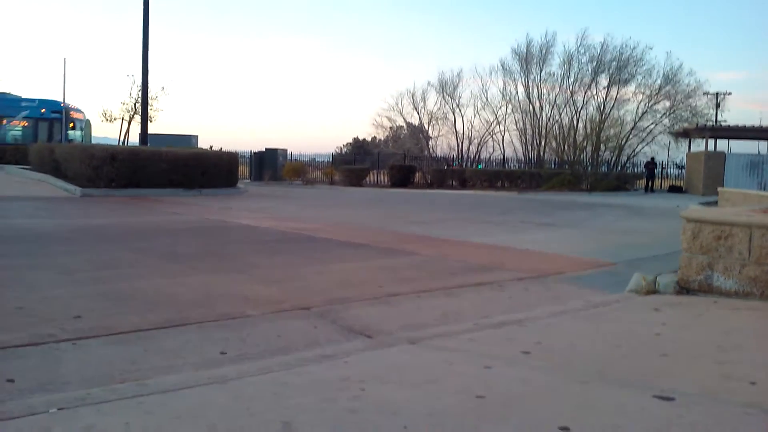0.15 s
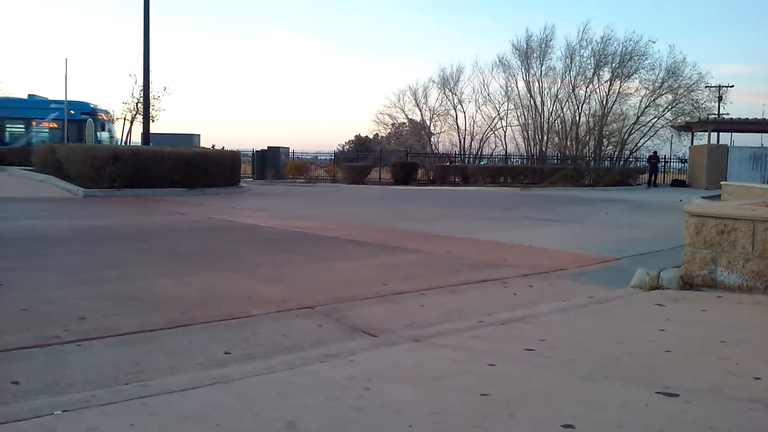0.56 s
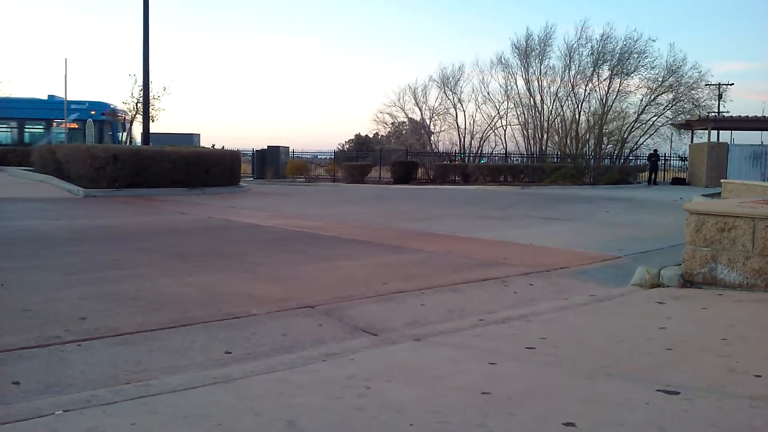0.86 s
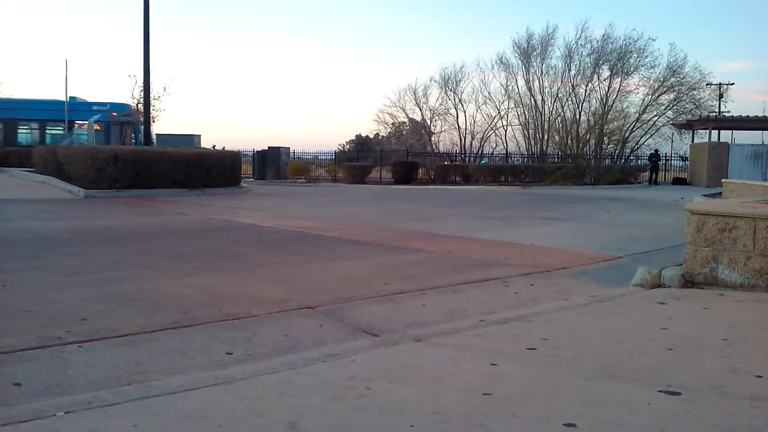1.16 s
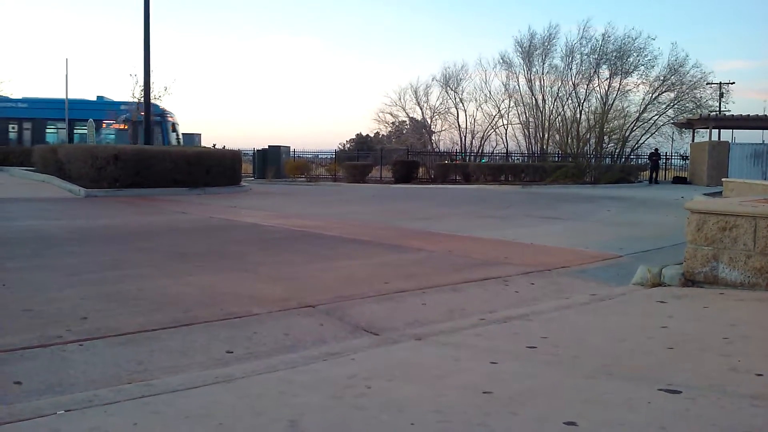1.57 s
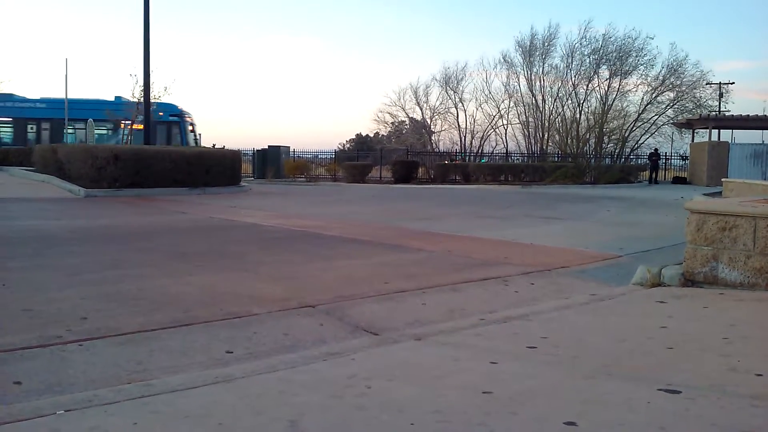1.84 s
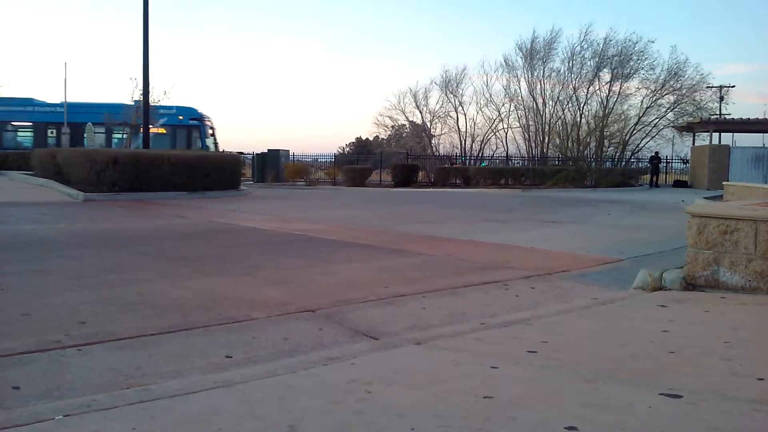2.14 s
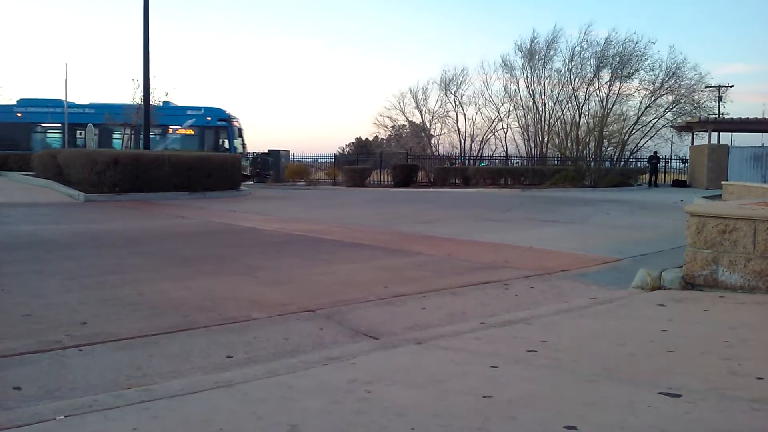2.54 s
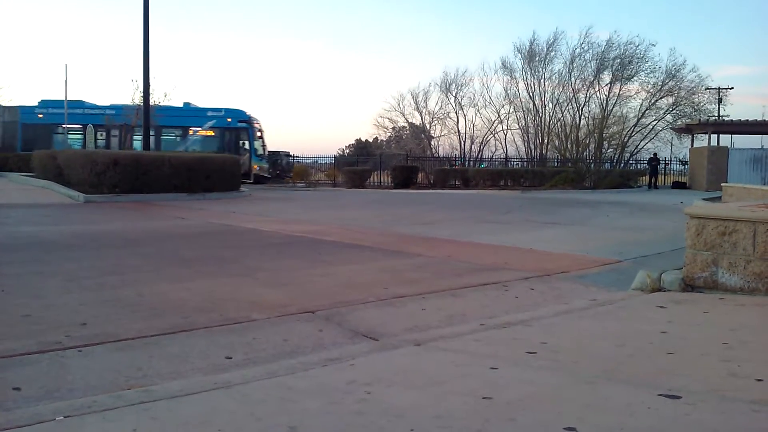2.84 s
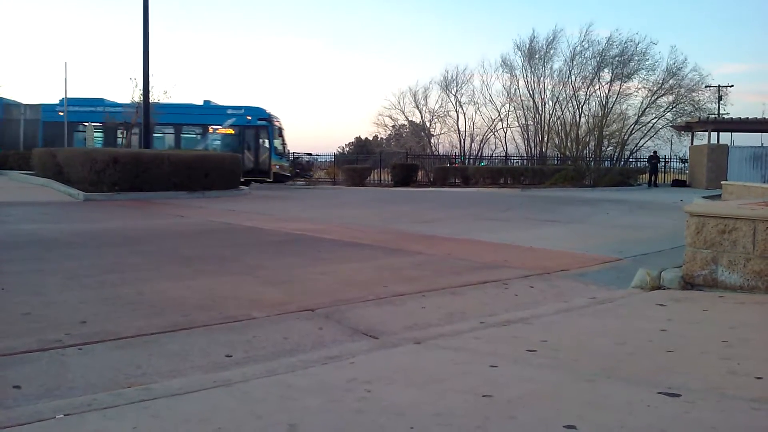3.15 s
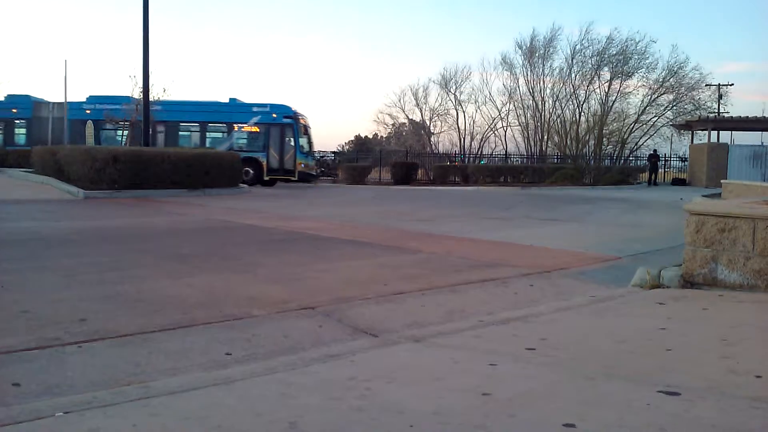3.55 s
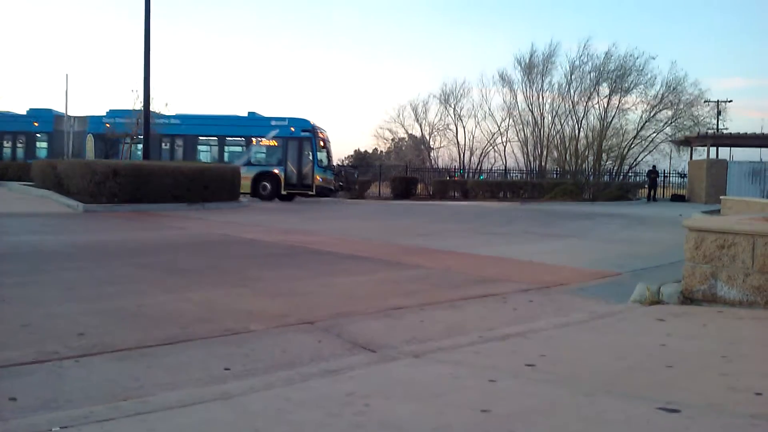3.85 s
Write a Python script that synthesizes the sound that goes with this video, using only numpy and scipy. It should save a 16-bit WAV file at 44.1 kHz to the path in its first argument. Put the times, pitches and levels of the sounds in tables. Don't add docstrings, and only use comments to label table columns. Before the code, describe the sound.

Strong wind buffets a hand-held microphone outdoors while a distant bus faintly whines and hisses once.

```python
import sys
import numpy as np
from scipy import signal
from scipy.fft import rfft, irfft
from scipy.io import wavfile
from scipy.ndimage import uniform_filter1d

SR = 44100
rng = np.random.default_rng(int(sys.argv[2]) if len(sys.argv) > 2 else 0)


def voltage_ratio(level):
    return 10 ** (np.asarray(level, float) / 20)


def to_wav(s):
    ch = np.atleast_2d(s).T
    pcm = np.round(np.clip(ch, -1, 1) * 32767)
    wavfile.write(sys.argv[1], SR, pcm.astype(np.int16))


N = 176400
TIME_S = np.arange(N) / SR

# multiple of WHINE_HZ, level in dB, roughness in Hz.
WHINE = [(1, -58.5, 9.8), (2, -66, 16), (3, -66, 51), (4, -64.5, 93)]
# time in seconds, level in dB, extra on the third partial in dB.
LOAD = [(0, -2, 4), (.5, 0.5, -1), (1.1, 0.5, -2.5), (2.7, -8.5, 2.5), (2.95, 1.5, 10.5), (3.05, 1.5, 5),
        (3.5, 8, 3.5), (4, -3.5, 2)]
# time in seconds, level in dB.
BODY_DB = [(0, -60.5), (2.2, -45), (2.6, -45.5), (3.1, -66.5), (3.6, -44), (4, -72)]
# frequency in Hz, density in dB per Hz.
LOT = [(40, 8.5), (320, 7.5), (440, -3.5), (1500, -7), (3300, -20), (4500, -22), (6300, -19.5),
       (15500, -41)]
# time in seconds, level in dB.
FAN_DB = [(0, 3), (.9, -3.5), (1.3, -6), (1.8, -6), (4, -9)]
# time in seconds, level in dB.
GUST = [(0, -62), (.19, -47), (.23, -31), (.7, -22), (.95, -27.5), (1.2, -36.5), (1.45, -31), (1.66, -26),
        (1.95, -27.5), (2.2, -33), (2.45, -33.5), (2.8, -37), (2.9, -36), (3.45, -23), (3.6, -36),
        (3.8, -36), (3.86, -22.5), (3.98, -27.5), (4, -36)]
# start in seconds, peak in dB, bite above 450 Hz in dB re peak, decay in
# seconds.
BUFFETS = [(0.211, -14, -34, 0.0053), (0.227, -3, -11.5, 0.012), (0.267, -6.5, -27, 0.0035),
           (0.355, -12.5, -39, 0.01), (0.407, -23, -38, 0.0081), (0.454, -13, -7, 0.025),
           (0.559, -1, -10.5, 0.017), (0.604, -8.5, -5, 0.021), (0.645, -20.5, 3, 0.032),
           (0.674, -13, -0.5, 0.01), (0.693, -6, -5.5, 0.0052), (0.754, -5, -11.5, 0.0089),
           (0.802, -7, -37, 0.012), (0.846, -7, -11.5, 0.036), (0.881, -8.5, 2.5, 0.029),
           (0.9, -16, 4, 0.011), (0.98, -16, -2.5, 0.033), (1.038, -7, -36, 0.0024),
           (1.138, -20, -20, 0.017), (1.299, -28.5, -30, 0.023), (1.37, -15, -27, 0.019),
           (1.398, -10.5, -13.5, 0.016), (1.425, -10.5, -12, 0.024), (1.518, -13, -40, 0.011),
           (1.556, -7.5, -11.5, 0.0049), (1.585, -4.5, -27, 0.007), (1.606, -4, -10.5, 0.028),
           (1.638, -2.5, -16, 0.031), (1.687, -4.5, -8, 0.006), (1.765, -16.5, -51, 0.006),
           (1.848, -8, -39, 0.018), (1.892, -11.5, -57, 0.058), (2.005, -11.5, -36, 0.0094),
                (2.121, -29, -40, 0.006), (2.234, -7.5, -12, 0.015), (2.396, -16.5, -30, 0.053),
                (2.465, -17.5, -2, 0.0077), (2.589, -7, -29, 0.0079), (2.845, -13, -27, 0.015),
                (2.862, -2, -23, 0.028), (2.891, -5, -9, 0.011), (2.908, -6.5, -9.5, 0.022),
                (2.986, -17, -14, 0.0052), (3.047, -12.5, -56, 0.025), (3.173, -17, -31, 0.0059),
                (3.227, -18, -26, 0.004), (3.259, 3, -12.5, 0.0042), (3.283, 4, -10.5, 0.0082),
                (3.312, 2.5, -11, 0.0023), (3.335, -8.5, -16, 0.013), (3.374, 2, -13, 0.0073),
                (3.392, -8, -5.5, 0.025), (3.448, -4, -34, 0.015), (3.835, -8, -27, 0.049),
                (3.871, -11, 0.5, 0.024), (3.892, 1.5, -12.5, 0.022), (3.917, -2.5, -2, 0.0047),
                (3.937, -0.5, -8, 0.031), (3.966, 0.5, -10, 0.012), (3.984, -6, -16.5, 0.003)]
# centre in seconds, peak in dB, pitch in Hz.
SLAPS = [(0.2168, -9, 216), (0.2334, -5, 380), (0.2418, -8.5, 252), (0.363, -4, 242), (0.4726, -2.5, 413),
         (0.568, -0.5, 233), (0.5763, 3, 366), (0.6127, -10, 230), (0.6321, -6, 250), (0.6491, -8.5, 292),
         (0.6755, -1, 398), (0.6865, -6, 347), (0.7004, -12, 245), (0.7642, -5, 218), (0.7873, -10.5, 260),
         (0.8121, -5.5, 240), (0.8626, -7.5, 147), (0.888, -3, 536), (0.8977, -13, 227),
         (0.9044, -0.5, 382), (0.9123, -0.5, 360), (1.4318, -7.5, 265), (1.5633, -7, 326),
         (1.5889, -12, 250), (1.614, -17, 310), (1.6342, -14, 250), (1.6466, -14, 220), (1.6614, -5.5, 226),
         (1.6931, -8.5, 247), (1.7748, -10, 250), (1.916, -6, 167), (2.0142, -10.5, 228),
         (2.2421, -5.5, 360), (2.2542, -9.5, 340), (2.598, -6, 240), (2.8704, -7, 290), (2.8846, -7.5, 260),
         (2.8956, -8, 310), (2.9181, -5, 222), (3.0533, -14.5, 210), (3.265, -3.0, 205), (3.2882, 2, 162),
         (3.317, -7.5, 346), (3.3459, -14, 180), (3.3837, -2.5, 205), (3.396, -8.5, 198), (3.444, -12, 200),
         (3.4574, -1, 136), (3.8419, -13, 253), (3.8677, -9, 250), (3.876, -11, 227), (3.8854, -6.5, 220),
         (3.895, -17.5, 410), (3.9118, -8.5, 204), (3.9254, 8.5, 271), (3.9426, 3, 285), (3.9512, 1, 220),
         (3.9646, 0, 240), (3.9789, -7, 170), (3.9921, -1.5, 266)]
# start in seconds, level in dB, decay in seconds, two resonances in Hz.
PUFFS = [(0.451, -45.5, 0.047, 2800, 8000), (1.25, -64, 0.0021, 2925, 7600),
         (1.295, -65, 0.014, 10700, 13050), (1.554, -53, 0.0075, 4600, 8100),
         (1.589, -49.5, 0.0016, 6530, 10800), (2.93, -60, 0.0053, 9000, 7900),
         (2.957, -63, 0.0054, 9000, 8200), (2.995, -59, .008, 9100, 8000), (3.42, -42.5, 0.026, 3370, 8200),
         (3.419, -49.5, 0.0034, 5000, 11450), (3.874, -56, 0.0058, 9500, 11500),
         (3.901, -39.5, 0.0016, 3620, 9200)]
# start in seconds, length in seconds, centre in Hz, width in Hz, level in dB.
RUBS = [
    (3.64, 0.26, 4640, 680, -61),
    (3.42, .3, 5200, 1800, -65),
    (1.6, .9, 5250, 700, -71),
    (2.21, .14, 4400, 3000, -63),
]
# time in seconds, level in dB, gain change in dB.
CRACKS = [
    (0.575, -27, 0.5),
    (0.8875, -27.5, -4),
    (3.285, -51, 0),
]
# frequency in Hz, density in dB per Hz.
HISS = [(760, -16), (1300, -10.5), (1700, -4), (2500, 1), (2950, 3.5), (3480, -3), (6620, -4.5),
        (15500, -23.5)]
# centre in Hz, width in Hz, level in dB re the jet.
NOZZLE = [(2900, 350, -12), (4600, 820, -7.5), (8000, 1100, -5)]

WHINE_HZ, WHINE_THROB_HZ, WHINE_THROB_DB = 735.5, 52.4, -2
BODY_HZ, BODY_WIDTH_HZ = 586, 230
LOT_DB, PORT_HZ, PORT_WIDTH_HZ, PORT_DB = -46, 8000, 1870, -59
EDDY_RATE, EDDY_SPREAD_DB, ROLL_HZ = 700, 4, 70.7
BUFFET_RISE_S, THUMP_HZ, BITE_HZ, BITE_TOP_HZ = 0.0034, 120, 450, 1020
SHARP_DB_PER_DB = 2
FLAP_WALK_DB = 1.5
LIMIT, KNEE = .9, 4
SLAP_CYCLES, SLAP_DB, SLAP_EDGE, SLAP_HUSH = 0.42, -1, 1.33, 2.06
CRACK_HZ, RECOVER_DB_PER_S = 890, 6.5
HISS_S, HISS_SNAP_S, HISS_RISE_S, HISS_HOLD_S, HISS_DB = 2.401, .005, 0.03, 0.083, -33
HISS_SAG_DB_PER_S, HISS_FALL_DB_PER_S2 = 41, 92


def curve(rows, col=1):
    rows = np.array(rows, float)
    return np.interp(TIME_S, rows[:, 0], rows[:, col])


def unit(x):
    return x / np.sqrt(np.mean(x ** 2))


def noise():
    return rng.standard_normal(N)


def band(x, hz, width_hz):
    return signal.lfilter(*signal.iirpeak(min(hz, .45 * SR), hz / width_hz, fs=SR), x)


def band_twice(x, hz, width_hz):
    return unit(band(band(x, hz, width_hz), hz, width_hz))


def low(x, hz):
    return signal.sosfilt(signal.butter(3, hz, fs=SR, output="sos"), x)


def low_in_phase(x, hz, order):
    return signal.sosfiltfilt(signal.butter(order, hz, fs=SR, output="sos"), x)


def high(x, hz, order):
    return signal.sosfilt(signal.butter(order, hz, "high", fs=SR, output="sos"), x)


def walk(rate):
    k = int(SR / rate)
    held = np.repeat(rng.standard_normal(N // 20)[:N // k + 1], k)
    return 2.8 * uniform_filter1d(uniform_filter1d(held, k), k)[:N]


def colour(points, flicker_db, rate):
    hz = np.fft.rfftfreq(N, 1 / SR) + 1
    points = np.array(points, float)
    spec = rfft(noise()) * voltage_ratio(np.interp(np.log(hz), np.log(points[:, 0]), points[:, 1]))
    out = 0
    for octave in np.arange(4, 14.5, .5):
        window = np.clip(1 - abs(np.log2(hz) - octave) * 2, 0, 1)
        out = out + voltage_ratio(flicker_db * walk(rate)) * irfft(spec * window, N)
    return unit(out)


def swell(s, rise_s, decay_s):
    t = np.maximum(TIME_S - s, 0)
    env = (1 - np.exp(-t / rise_s)) ** 2 * np.exp(-t / decay_s)
    return env / env.max()


def bus():
    throb = WHINE_THROB_DB * np.sin(2 * np.pi * np.cumsum(WHINE_THROB_HZ * (1 + 0.13 * walk(3.2))) / SR)
    out = voltage_ratio(curve(BODY_DB) + 2.0 * walk(9.1)) * band_twice(noise(), BODY_HZ, BODY_WIDTH_HZ)
    for k, (multiple, db, rough_hz) in enumerate(WHINE):
        extra = 0
        if k == 2:
            extra = curve(LOAD, col=2) - 1.5 + 0.6 * walk(14) + throb
        elif k == 3:
            extra = -3.5 * TIME_S
        out = out + voltage_ratio(db + curve(LOAD) + extra) * unit(band(noise(), multiple * WHINE_HZ, rough_hz))
    return out


def lot():
    town = colour(LOT, 1.6, 8)
    air = noise()
    top = unit(low(band(air[::-1], 13000, 4300), 12000))
    fan = band_twice(air, PORT_HZ, PORT_WIDTH_HZ) + voltage_ratio(-5.5) * top
    return voltage_ratio(LOT_DB) * town + voltage_ratio(PORT_DB + curve(FAN_DB) + 1.0 * walk(29)) * fan


def eddies(rate, spread_db):
    return (rng.random(N) < rate / SR) * noise() * voltage_ratio(spread_db * rng.exponential(size=N))


def even(x, size):
    return x / np.sqrt(uniform_filter1d(unit(x) ** 2, size=size) + 0.026) / x.std()


def wind():
    roll = even(low(band(eddies(EDDY_RATE, EDDY_SPREAD_DB), ROLL_HZ, 81), 218), size=3000)
    flap = even(low(band(eddies(EDDY_RATE, EDDY_SPREAD_DB), 2.28 * ROLL_HZ, 200), 368), size=3000)
    knocks = eddies(330, 2.08) + 0.39 * eddies(EDDY_RATE, EDDY_SPREAD_DB)
    thump = even(low(band(knocks, THUMP_HZ, 176), 425.0), size=900)
    bite = even(low(low(band(knocks, BITE_HZ, 333), BITE_TOP_HZ), 1.46 * BITE_TOP_HZ), size=800)
    dull = low_in_phase(bite, 700, 2)
    gust = curve(GUST)
    flap_db = 2.48 * (gust + 27.0) - 32.5 + FLAP_WALK_DB * walk(25.07)
    out = voltage_ratio(gust + 1.0 * walk(16)) * roll + voltage_ratio(flap_db) * (flap + voltage_ratio(-12) * dull)
    for s, db, bite_db, decay_s in BUFFETS:
        a = int(s * SR)
        part = slice(a, a + 6000)
        env = swell(0, BUFFET_RISE_S, max(decay_s, .003))[:min(6000, N - a)]
        sharp_gain = voltage_ratio(min(SHARP_DB_PER_DB * (db + bite_db + 8.5), 0))
        edge = dull[part] + sharp_gain * (bite - dull)[part]
        out[part] += voltage_ratio(db - 9.0) * env * (thump[part] + voltage_ratio(bite_db + 6.5) * env ** 1.22 * edge)
    sharp = slaps()
    near = uniform_filter1d(uniform_filter1d(np.abs(sharp), size=200), size=200)
    out = high(out / (1 + SLAP_HUSH * near) + sharp, 45, 2)
    limited = out / (1 + (out / LIMIT) ** KNEE) ** (1 / KNEE)
    return low(low(limited, 2650), 3100)


def slaps():
    out, t = np.zeros(N + 2000), np.arange(-1000, 1000) / SR
    for s, db, hz in SLAPS:
        a = int(s * SR) - 1000
        env = np.exp(-np.abs(t * hz / SLAP_CYCLES) ** SLAP_EDGE)
        out[a:a + 2000] += voltage_ratio(db + SLAP_DB) * env * np.cos(2 * np.pi * (hz * t + rng.random()))
    return out[:N]


def puffs():
    air = noise()
    out = 0
    for s, db, decay_s, hz, hz2 in PUFFS:
        tone = band_twice(air, hz, 520) + 0.63 * band_twice(air, hz2, 1400) + 0.3 * band_twice(air, 5940, 1400)
        out = out + voltage_ratio(db) * swell(s, 0.0002, decay_s) * tone
        if hz < 4000:
            out = out + voltage_ratio(db) * swell(s, .0005, .0025) * np.sin(2 * np.pi * hz * TIME_S)
    for s, length_s, hz, width_hz, db in RUBS:
        u = np.clip((TIME_S - s) / length_s, 0, 1)
        out = out + voltage_ratio(db + 2.3 * walk(60)) * np.sin(np.pi * u ** 0.77) ** 2 * band_twice(air, hz, width_hz)
    return out


def cracks():
    kicks = np.zeros(N)
    for s, db, _ in CRACKS:
        kicks[int(s * SR)] = voltage_ratio(db)
    pole = [1, -np.exp(-2 * np.pi * CRACK_HZ / SR)]
    return signal.lfilter([1], pole, signal.lfilter([1], pole, kicks))


def ducking():
    gain_db = 0
    for s, _, drop_db in CRACKS:
        gain_db = gain_db + (TIME_S > s) * np.minimum(drop_db + RECOVER_DB_PER_S * (TIME_S - s) / 2, 0)
    return voltage_ratio(gain_db)


def air_release():
    jet = colour(HISS, .6, 17)
    for hz, width_hz, db in NOZZLE:
        jet = jet + voltage_ratio(db + 1.0 * walk(45)) * unit(band(noise(), hz, width_hz))
    lows, mids = low_in_phase(jet, 4300, 4), low_in_phase(jet, 9500, 4)
    u = np.maximum(TIME_S - HISS_S, 0)
    out = 0
    # band, share that snaps open, delay of the rest in seconds, relative speed of the fall.
    for part, step, late_s, faster in ((lows, .0, .014, .85), (mids - lows, .22, 0, 1.0), (jet - mids, .25, 0, 1.15)):
        after = np.maximum(u - HISS_HOLD_S / faster ** 2, 0)
        snap = 1 - np.exp(-u / HISS_SNAP_S)
        fill = 1 - np.exp(-(np.maximum(u - late_s, 0) / HISS_RISE_S) ** 2)
        fall_db = faster * (HISS_SAG_DB_PER_S * after + HISS_FALL_DB_PER_S2 * after ** 2)
        out = out + part * (step * snap + (1 - step) * fill) * voltage_ratio(HISS_DB - fall_db)
    return out


def scene():
    far = (bus() + lot()) * ducking()
    return (far + wind() + puffs() + cracks() + air_release())[None]


def top_cut(x):
    return signal.sosfilt(signal.butter(12, 15630, fs=SR, output="sos"), x)


def record(dry):
    mix = np.clip(high(dry, 12, 1), -1, 1)
    return top_cut(mix)


dry = scene()
out = record(dry)
to_wav(out)
```